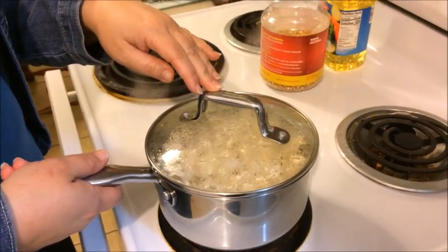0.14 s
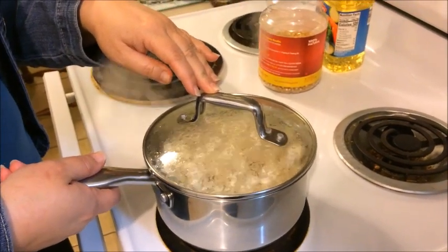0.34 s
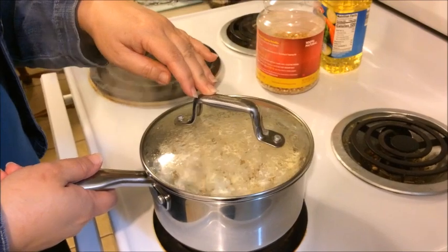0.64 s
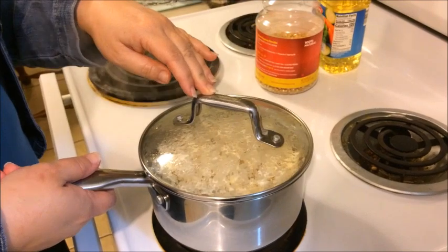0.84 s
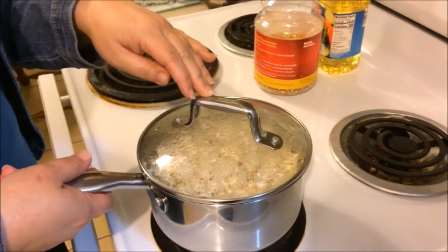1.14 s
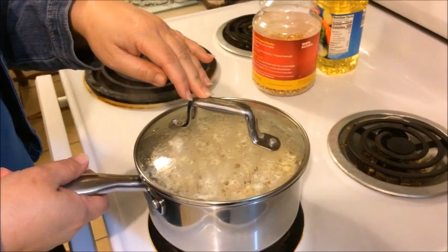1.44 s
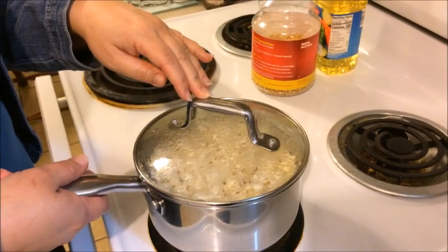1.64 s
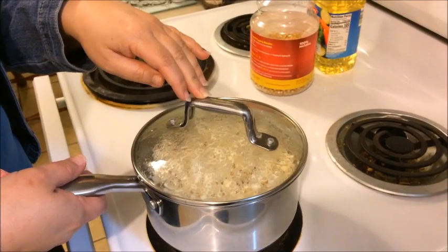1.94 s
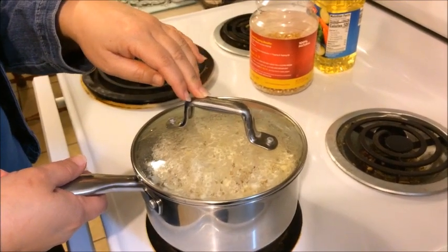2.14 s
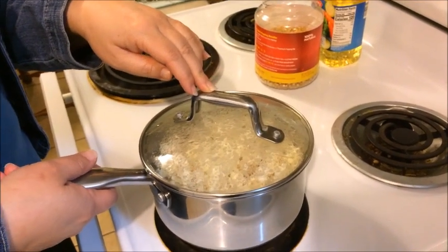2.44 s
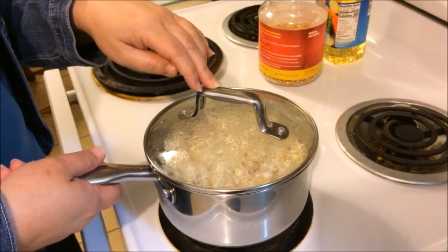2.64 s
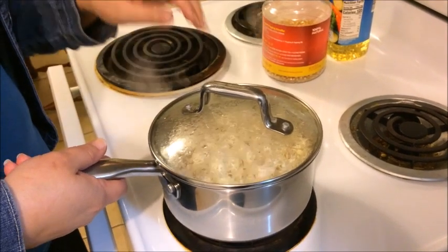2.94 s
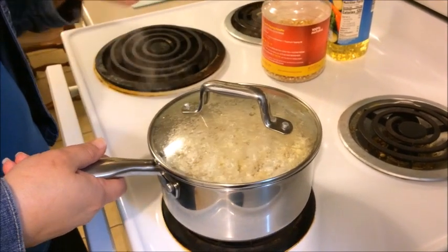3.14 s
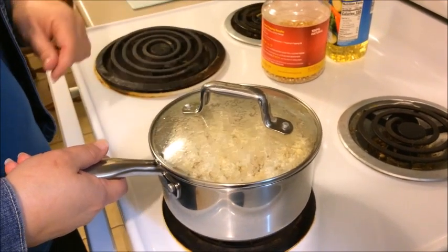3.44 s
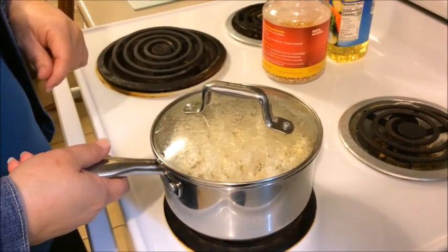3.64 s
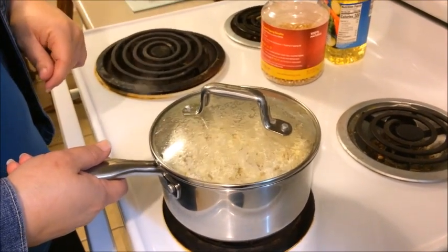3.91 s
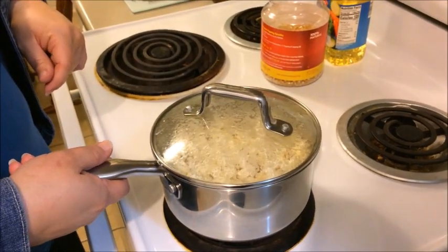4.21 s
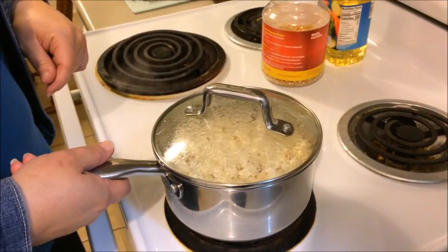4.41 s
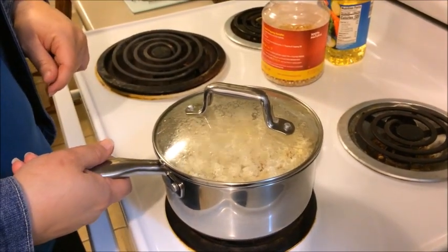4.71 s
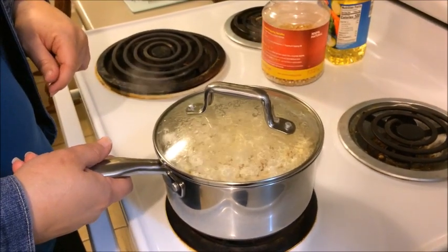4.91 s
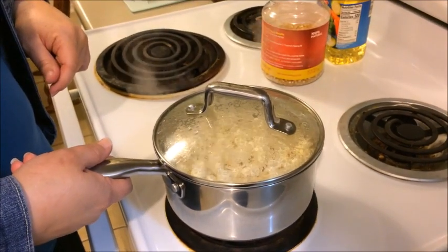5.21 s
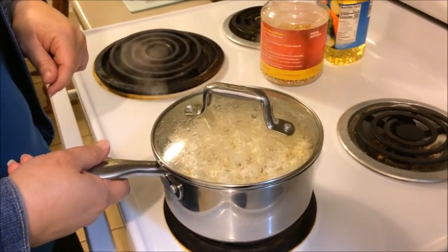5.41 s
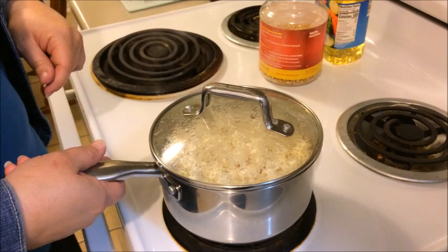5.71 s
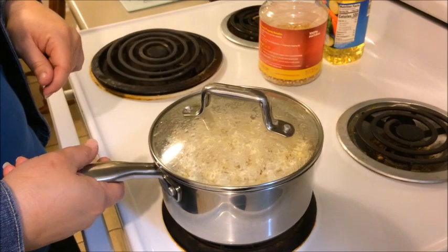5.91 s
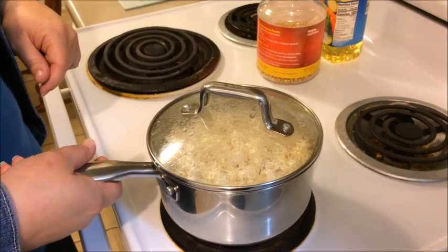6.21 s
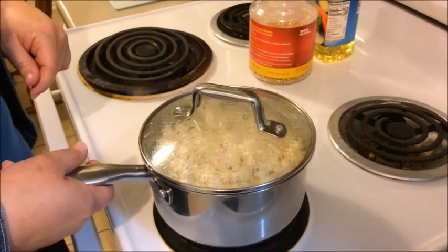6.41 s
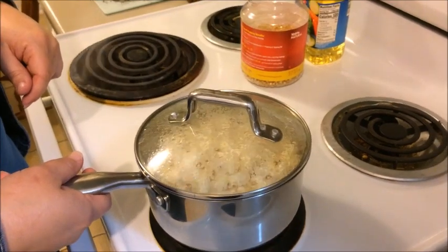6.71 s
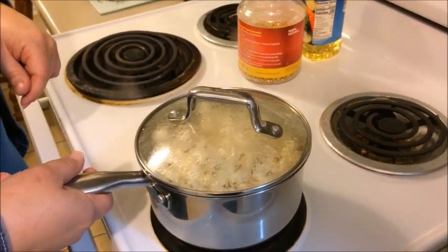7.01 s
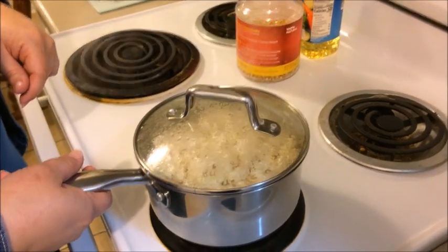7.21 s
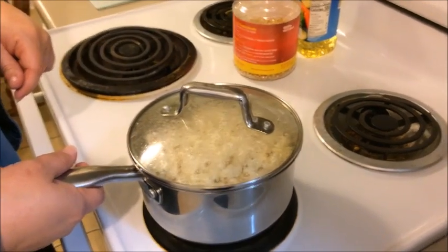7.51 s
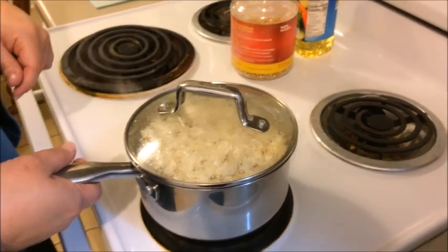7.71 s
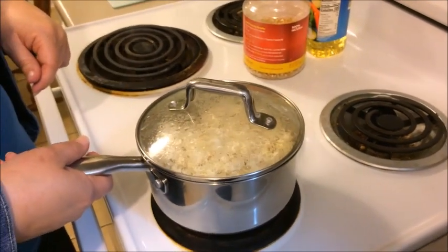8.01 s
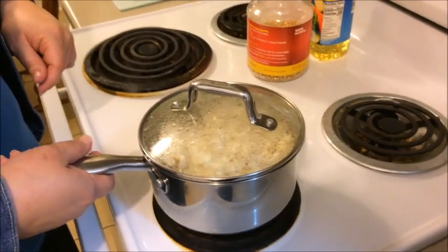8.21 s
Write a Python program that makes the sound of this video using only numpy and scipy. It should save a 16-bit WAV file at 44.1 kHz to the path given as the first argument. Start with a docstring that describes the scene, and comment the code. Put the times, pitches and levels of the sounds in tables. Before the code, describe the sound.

Irregular pops ring a covered saucepan, each a dry snap with a soft hollow puff, between light ticks of thrown kernels on steel and glass. Oil fizz and shuffling fade toward the middle, return strongly around five seconds, ease and rise again. Bright spits join the second half. Close microphone, small kitchen reverberation, low quiet hum.

```python
"""Popcorn bursts in a steel pan under a glass lid, while oil sizzles and an appliance hums, for 8.35 s.
At once pops, knocks and loud sizzling; the sizzle and shuffling then thin out, softest near 4 s.
From about 5 s they swell, settle and swell again, and bright spits of water join in; a last pop comes at 8.28 s.
A pop is noise ringing the pan plus a low thump; knocks and taps only ring it, and frying is many tiny pings.
The hum is two sine tones over soft, coloured noise."""
import sys
import numpy as np
from scipy import signal
from scipy.fft import rfft, irfft, next_fast_len
from scipy.io import wavfile
from scipy.ndimage import map_coordinates

SR = 44100
rng = np.random.default_rng(int(sys.argv[2]) if len(sys.argv) > 2 else 0)


def wav_out(sig):
    """Save sig, one row per channel (or a flat mono array), as 16-bit PCM at SR to the path in sys.argv[1]."""
    wavfile.write(sys.argv[1], SR, np.round(np.clip(np.atleast_2d(sig).T, -1, 1) * 32767).astype(np.int16))


N = 368235
TIME = np.arange(N) / SR  # s, the whole scene
AGE = np.arange(SR // 4) / SR  # s since a short sound began

# bursting kernels: start_s, snap_db (hull), kick_db (against the pan), kick_hz, tear_s, steam_db (thump gain)
BURSTING_KERNELS = [(0.0443, -39, -38, 2600, 0.0095, -36.5), (.1924, -27.5, -44, 3000, 0.0022, -33),
                    (0.3464, -29, -44, 1600, 0.0016, -24.5), (0.545, -35.5, -41.5, 1100, 0.021, -29.5),
                    (.6324, -30.5, -46, 1800, .0007, -27), (0.6907, -32, -34, 3200, 0.0035, -28),
                    (1.2707, -35, -36.5, 2700, 0.0035, -33), (1.4676, -31, -44, 1000, .002, -27.5),
                    (1.5968, -41, -26, 2820, 0.0017, -29), (1.7384, -27.5, -42, 3500, .002, -29.5),
                    (1.8005, -31.5, -32.5, 1400, 0.0024, -27.5), (2.3232, -38.5, -39, 2520, 0.018, -31),
                    (2.7441, -31, -36.5, 1700, 0.0044, -28.5), (2.918, -31.5, -44.5, 1000, 0.0012, -41),
                    (2.9446, -37, -35, 3700, .003, -29), (3.0174, -23.5, -30, 2190, 0.0016, -27),
                    (3.0586, -33.5, -46, 1000, .0016, -23.5), (3.3608, -25.5, -34, 1590, .0014, -28),
                    (3.8763, -31.5, -34, 1590, 0.0051, -28.5), (4.361, -28.5, -32, 1400, .007, -24.5),
                    (4.8047, -35, -32.5, 1040, 0.0037, -24.5), (4.8812, -29.5, -40.5, 850, 0.00034, -28),
                    (5.0714, -31.5, -36, 1700, 0.01, -24), (5.247, -34.5, -38.5, 1600, 0.011, -24),
                    (5.426, -35.5, -32, 3700, .002, -33), (5.749, -42, -38.5, 3500, .004, -38.5),
                    (6.5086, -56, -40, 2000, .0003, -29.5), (6.618, -24, -41, 2600, 0.0032, -36.5),
                    (6.6487, -32, -44, 1050, 0.0016, -28), (6.82, -44, -51, 900, 0.012, -38),
                    (7.062, -36.5, -27.5, 2100, 0.0018, -25), (7.11, -26, -33, 2000, 0.0024, -30),
                    (7.1526, -37.5, -41.5, 1500, .0012, -29), (7.6427, -41.5, -41, 1190, .0005, -24.5),
                    (7.838, -38, -22, 3150, 0.0011, -29.5), (8.281, -35, -61, 2000, .002, -31.5)]
# thrown kernels hitting steel or glass hard: start_s, level_db, pitch_hz, contact_s
THROWN_KERNELS = [(.072, -39.5, 4000, .0007), (.36, -29.5, 2480, 0.00054), (.367, -25.5, 5300, 0.00043),
                  (.641, -35.5, 4200, .0008), (1.192, -46, 3600, .002), (1.391, -42.5, 4000, .002),
                  (2.27, -48, 3620, .0016), (2.385, -43, 4500, .0006), (3.139, -43, 5050, .0045),
                  (3.257, -46, 3200, .004), (3.366, -33.5, 4000, 0.0012), (3.85, -43.5, 3000, .007),
                  (4.249, -39.5, 3020, 0.003), (4.444, -47, 3700, .0004), (4.524, -48, 3000, .002),
                  (4.654, -44, 6050, .003), (5.179, -40, 2420, .001), (5.262, -36, 5500, .012),
                  (5.414, -34.5, 2790, 0.0036), (5.459, -31.5, 3100, 0.00045), (5.5, -36.5, 2000, 0.00067),
                  (5.671, -39, 2680, .012), (5.686, -35, 6370, .0006), (5.863, -43.5, 2700, 0.0043),
                  (6.0638, -34.5, 5930, 0.00087), (6.17, -42, 3200, .0005), (6.23, -43, 1600, .001),
                  (6.516, -34, 4800, 0.0034), (6.882, -45.5, 1900, .0012), (6.922, -45.5, 1200, .002),
                  (7.17, -44, 6500, .012), (7.2, -40.5, 1490, 0.0046), (7.453, -46, 1280, .002),
                  (7.652, -35.5, 950, 0.0017), (7.816, -45, 950, .008), (7.885, -37, 4800, 0.0021)]
# activity in the pan, before each layer's own trim: time_s, shuffle_db (loose kernels), sizzle_db (oil)
PAN_ACTIVITY = [(0.0, -47.5, -43), (0.6, -45, -48), (0.86, -51, -48.5), (1.6, -51.5, -50),
                (2.02, -53.5, -51.5), (2.3, -50.5, -50.5), (2.74, -57.5, -52.5), (2.98, -50.5, -53),
                (3.28, -51, -49), (3.51, -54.5, -54), (4.04, -61, -57.5), (4.63, -56.5, -55),
                (5.28, -42.5, -39.5), (6.12, -50, -45.5), (7.0, -48, -43), (7.54, -53.5, -47),
                (7.86, -47.5, -43.5), (8.35, -51, -46.5)]
# ringing of the pan with its lid and the air inside: pitch_hz, relative_db, t60_s (time to fall 60 dB)
PAN_MODES = [(851, -8, .07), (1037, -1, .08), (1077, 0, .07), (1235, -4, .06), (1510, 0, .12),
             (2132, 0, .07), (2228, 2, .08), (2320, 0, .045), (2460, -6, .08), (3130, -2, .05),
             (3210, 0, .07), (3302, -1, .11), (3620, -3, .06), (4025, -8, .08), (4620, -3, .04),
             (4805, 0, .06), (5590, -3, .05), (6516, 1, .06), (6765, 1, .07), (8715, -1, .04),
             (8980, 0, .05)]
# air under the lid and the stove top, pushed by a puff: pitch_hz, relative_db, t60_s
CAVITY_MODES = [(125, -22.5, .12), (176, -21, .07), (237.5, -4.5, 0.031), (244.4, -14, 0.13),
                (338, -17, 0.073), (396, -32, 0.062), (297, -16, 0.033)]
# colour of the sizzling oil: frequency_hz, gain_db
OIL_COLOUR = [(800, -20.5), (2000, -10.5), (3300, -16.5), (4700, 1), (5150, -17), (5600, -1), (6700, 2),
              (7500, -8.5), (9300, 1.5), (10200, -13), (13000, -14), (16000, -15)]
# colour of the shuffling kernels: frequency_hz, gain_db
SHUFFLE_COLOUR = [(400, -34), (820, -10.5), (1050, -13), (1250, -7.5), (1520, 0), (1850, -5.5), (2400, -2),
                  (2850, -6.5), (3250, 1.5), (4500, -5), (7000, -23), (16000, -48)]
# colour of the air in the kitchen: frequency_hz, gain_db
KITCHEN_COLOUR = [(20, -16), (55, -1), (85, 0.5), (170, -6), (260, 0.5), (340, -10), (800, -16.5),
                  (2000, -30), (16000, -17.5)]
# tones of the humming appliance, around which the level wavers: pitch_hz, level_db
HUM_TONES = [(119.7, -62.5), (258, -67)]
# bands that set the colour of a crack: low_hz, high_hz
CRACK_BANDS = [(810, 1230), (1490, 2550), (2950, 4900), (5450, 9400), (9900, 14500)]
# drops of water spitting in the oil: start_s, peak_db
WATER_SPITS = [(5.9886, -20), (6.0297, -29.5), (6.3924, -22.5), (6.4465, -24), (7.7455, -29),
               (8.089, -26.5), (5.016, -30.5), (5.9541, -29), (6.9441, -37), (7.2658, -27)]
# fingers resting on the lid: time_s, damping (0 to 1, share of the lid's ring removed)
LID_FINGERS = [(0, 0.3), (2.8, 0.4), (3.1, 0.2)]

BAND_FILTERS = [signal.butter(3, band, "bandpass", fs=SR, output="sos") for band in CRACK_BANDS]
BAND_CENTRES = np.sqrt(np.prod(CRACK_BANDS[:-1], axis=1))  # Hz, all but the top band
HULL_TILT_DB_PER_OCTAVE = 8  # the snap of a hull rises toward the treble
BELOW_DB_PER_OCTAVE, ABOVE_DB_PER_OCTAVE = 11, 6.5  # a blow weakens either side of its pitch
TAPS_PER_S, TAP_DB, TAP_SPREAD_DB = 3, -3, 4.5  # levels are relative to shuffle_db
TAP_HZ, TAP_SPREAD_OCTAVES, TAP_CONTACT_S = 3830, 0.43, .002  # each tap lands on another spot


def amp(db):
    """Turns decibels into a gain."""
    return 10 ** (np.asarray(db) / 20)


def unit(x):
    """Scales a sound to rms 1."""
    return x / np.sqrt(np.mean(x ** 2) + 1e-20)


def dying(t60):
    """Fades a short sound by 60 dB in t60 seconds."""
    return np.exp(-np.log(1000) * AGE / max(t60, 1e-4))


def burst(envelope):
    """Shapes noise with an envelope and gives it energy 1."""
    x = envelope * rng.standard_normal(len(AGE))
    return x / np.linalg.norm(x)


def coloured(x, points):
    """Filters x through a curve of (Hz, dB) points and scales it to rms 1."""
    size = next_fast_len(N + SR // 2)
    hz, db = np.transpose(points)
    bins_hz = np.fft.rfftfreq(size, 1 / SR)
    gain = amp(np.interp(np.log(bins_hz + 1), np.log(hz), db))
    return unit(irfft(rfft(x, size) * gain, size)[:N])


def wobble(rate):
    """Draws a smooth random curve through `rate` random points a second."""
    coarse = TIME[::128]
    knots = rng.standard_normal(int(N * rate / SR) + 4)
    return np.interp(TIME, coarse, map_coordinates(knots, [coarse * rate]))


def add(track, s, sound):
    """Mixes a sound into the track at s seconds."""
    start = max(round(s * SR), 0)
    track[start:start + len(sound)] += sound[:N - start]


MODE_RINGS = np.array([amp(db) * dying(t60) * np.exp(2j * np.pi * hz * AGE) for hz, db, t60 in PAN_MODES])


def pan_response(ring_db, scatter_db, scatter_t60, spread_db=3):
    """A click at one spot in the pan: direct sound, quick echoes between steel and lid, and ringing."""
    # each spot excites the modes with other strengths and phases
    strengths = amp(spread_db * rng.standard_normal(len(PAN_MODES)))
    phases = np.exp(2j * np.pi * rng.random(len(PAN_MODES)))
    ring = ((strengths * phases) @ MODE_RINGS).real
    ring = amp(ring_db) * ring / np.linalg.norm(ring)
    direct = AGE == 0
    return direct + ring + amp(scatter_db) * burst(dying(scatter_t60))


def in_kitchen(x, wet_db, t60, echo_db, echo_s=.0082, build_s=0.0022):
    """Adds an echo off the back panel of the stove and the kitchen's fading reverberation."""
    delay = max(round(echo_s * SR), 0)
    near = x + amp(echo_db) * np.pad(x, (delay, 0))[:len(x)]
    tail = burst(dying(t60) * (1 - np.exp(-AGE / build_s)))
    return near + amp(wet_db) * signal.fftconvolve(x, tail)[:len(x)]


def crack(levels_db, length_s, ring_db, room_db, grit_db=4.5, shortest_s=0.00056, top_db=-12.5, top_slope=0.12):
    """A quick run of tiny fractures rings the pan; where and how hard it happens sets its colour."""
    run = np.exp(-AGE / (abs(length_s) + shortest_s))
    grit = amp(grit_db * rng.standard_normal(len(AGE)))
    response = pan_response(ring_db, scatter_db=2.0, scatter_t60=0.064)
    sound = signal.fftconvolve(burst(run * grit), response)[:len(AGE)]
    sound = in_kitchen(sound, room_db, t60=0.34, echo_db=-17.5)
    # the sharper the crack, the further it reaches into the top octave
    sharpness_db = min(levels_db[-1] - levels_db[-2], 10)
    fizz_db = levels_db[-1] + top_db + top_slope * sharpness_db
    parts = [signal.sosfilt(sos, sound) for sos in BAND_FILTERS]
    attack = SR // 50  # each band's level is set over its first 20 ms
    return sum(amp(db) * part / np.std(part[:attack]) for db, part in zip([*levels_db, fizz_db], parts))


def blow_colour(db, pitch_hz):
    """Band levels of a kernel striking the pan: the harder the spot, the higher the pitch."""
    octaves = np.log2(BAND_CENTRES / pitch_hz)
    return db + np.minimum(BELOW_DB_PER_OCTAVE * octaves, -ABOVE_DB_PER_OCTAVE * octaves)


def room_tone(air_db=-62, waver_db=1.8):
    """A low rush of air is coloured noise; an appliance hums in wavering sine tones."""
    hum = np.zeros(N)
    for hz, db in HUM_TONES:
        level = amp(db + waver_db * wobble(3.11)) * np.sqrt(2)  # a sine of this height has rms amp(db)
        drift = .2 * wobble(2)  # radians
        hum += level * np.sin(2 * np.pi * hz * TIME + drift)
    return hum + amp(air_db) * coloured(rng.standard_normal(N), KITCHEN_COLOUR)


def patter(rate, spread_db, life_s, high_hz, ring_db, spectrum, size, count=2):
    """Brief pings of unequal size and pitch, `rate` a second, ring `count` spots in the pan, at rms 1."""
    total, step = np.zeros(N), np.arange(size)  # each ping lasts `size` samples
    for spot in range(count):
        response = pan_response(ring_db, scatter_db=6.0, scatter_t60=0.032, spread_db=2.5)
        when, pitch, strength, phase = rng.random((int(rate / count * N / SR), 4)).T[:, :, None]
        # many faint pings, few strong ones
        height = amp(spread_db * strength ** 3)
        fade = np.exp(-step / SR / life_s)
        pings = height * fade * np.cos(2 * np.pi * (pitch * high_hz * step / SR + phase))
        places = (when * N).astype(int) + step
        grains = np.bincount(places.ravel(), pings.ravel(), N)[:N]
        total += signal.oaconvolve(grains, response)[:N]
    return coloured(total, spectrum)


def frying(oil_db=-1, crackle_db=-8, shuffle_db=-1):
    """Tiny steam bubbles burst in the oil, a few larger ones crackle; loose kernels roll on the bottom."""
    s, kernels_db, sizzle_db = np.transpose(PAN_ACTIVITY)
    fizz = amp(oil_db + 2.0 * wobble(14)) * patter(
        rate=5000, spread_db=15.5, life_s=.00008, high_hz=16300, ring_db=-2.5, spectrum=OIL_COLOUR, size=20)
    crackle = amp(crackle_db) * patter(
        rate=300, spread_db=18, life_s=0.00023, high_hz=14200, ring_db=-6, spectrum=OIL_COLOUR, size=64)
    kernels = amp(shuffle_db + 1.5 * wobble(20)) * patter(
        rate=800, spread_db=17, life_s=0.0005, high_hz=5860, ring_db=-1, spectrum=SHUFFLE_COLOUR, size=96)
    oil = amp(np.interp(TIME, s, sizzle_db)) * (fizz + crackle)
    return oil + amp(np.interp(TIME, s, kernels_db)) * kernels


def lid_held(x, lid_hz=1510, width_hz=260):
    """Fingers on the lid take away part of one strong ring."""
    s, damping = np.transpose(LID_FINGERS)
    without_ring = signal.lfilter(*signal.iirnotch(lid_hz, lid_hz / width_hz, SR), x)
    return x + np.clip(np.interp(TIME, s, damping), 0, 1) * (without_ring - x)


def taps():
    """Kernels settle and tap the pan at random, louder when the heap is moving."""
    track = np.zeros(N)
    s, kernels_db, _ = np.transpose(PAN_ACTIVITY)
    draws = rng.uniform(-1, 1, (int(TAPS_PER_S * N / SR), 3))
    for slot, (when, strength, hardness) in enumerate(draws):
        at = (slot + (1 + when) / 2) / TAPS_PER_S  # one tap somewhere in each time slot
        db = np.interp(at, s, kernels_db) + TAP_DB + TAP_SPREAD_DB * strength
        colour = blow_colour(db, TAP_HZ * 2 ** (TAP_SPREAD_OCTAVES * hardness))
        add(track, at, crack(colour, TAP_CONTACT_S, ring_db=-3.0, room_db=-6.0))
    return track


def spits(level_db=0, low_hz=4500, high_hz=9800):
    """A drop flashes to steam: one very short, bright snap."""
    track = np.zeros(N)
    bright = signal.butter(2, [low_hz, high_hz], "bandpass", fs=SR, output="sos")
    for s, db in WATER_SPITS:
        response = pan_response(ring_db=4, scatter_db=-15, scatter_t60=0.032)
        snap = signal.sosfilt(bright, signal.fftconvolve(burst(dying(0.0024)), response))
        add(track, s, amp(db + level_db) * snap / np.abs(snap).max())
    return track


def knocks(level_db=0):
    """Thrown kernels ring the pan without any puff."""
    track = np.zeros(N)
    for s, db, pitch_hz, contact_s in THROWN_KERNELS:
        add(track, s, crack(blow_colour(db, pitch_hz), contact_s, ring_db=-2.5, room_db=-7.0))
    return amp(level_db) * track


def pop_colour(snap_db, kick_db, kick_hz):
    """Band levels of a bright hull snap together with the kernel's kick against the pan."""
    snap = snap_db + HULL_TILT_DB_PER_OCTAVE * np.log2(BAND_CENTRES / BAND_CENTRES[-1])
    return 20 * np.log10(np.hypot(amp(snap), amp(blow_colour(kick_db, kick_hz))))


def thump(detune=0.015, rush_db=-4, rush_t60=0.14):
    """A puff of steam swings the air in the pan and rushes through the heap of corn."""
    pitch = 1 + detune * rng.standard_normal()  # every puff is tuned slightly differently
    swing = sum(amp(db) * dying(t60) * np.sin(2 * np.pi * hz * pitch * AGE) for hz, db, t60 in CAVITY_MODES)
    rush_band = signal.butter(2, [280, 750], "bandpass", fs=SR, output="sos")
    rush = signal.sosfilt(rush_band, rng.standard_normal(len(AGE)))
    return in_kitchen(swing + amp(rush_db) * dying(rush_t60) * rush, wet_db=-5.5, t60=0.34, echo_db=-13)


def pops(crack_db=0, thump_db=0):
    """The hull tears, the kernel kicks off the pan and the steam escapes at the same instant."""
    track = np.zeros(N)
    for s, snap_db, kick_db, kick_hz, tear_s, steam_db in BURSTING_KERNELS:
        hull = crack(pop_colour(snap_db, kick_db, kick_hz), tear_s, ring_db=0.5, room_db=-10.0)
        add(track, s, amp(crack_db) * hull + amp(steam_db + thump_db) * thump())
    return track


def scene():
    """Adds up everything heard from just above the stove."""
    background = room_tone() + lid_held(frying())
    return (background + taps() + spits() + knocks() + pops())[None]


def record(dry, low_cut_hz=52, top_hz=15900):
    """Thins out the deepest bass and keeps nothing from top_hz upward."""
    thinned = signal.sosfilt(signal.butter(3, low_cut_hz, "highpass", fs=SR, output="sos"), dry)
    size = next_fast_len(N + SR // 2)
    kept = np.fft.rfftfreq(size, 1 / SR) < top_hz
    return irfft(rfft(thinned, size) * kept, size)[:, :N]


dry = scene()
out = record(dry)
wav_out(out)
```